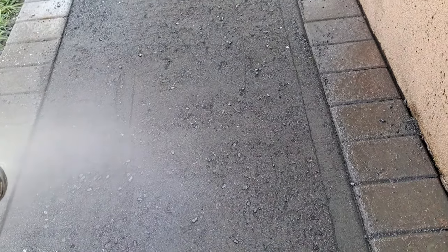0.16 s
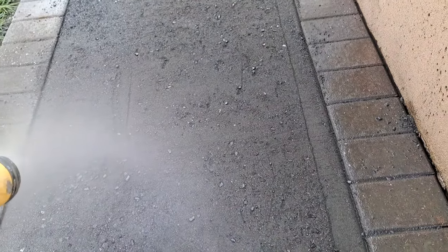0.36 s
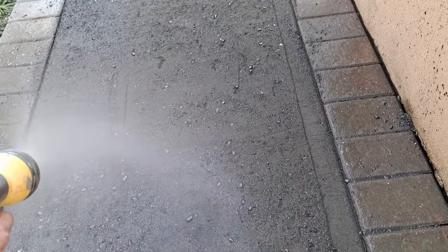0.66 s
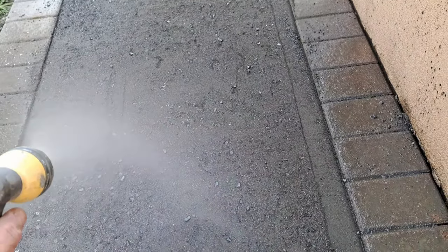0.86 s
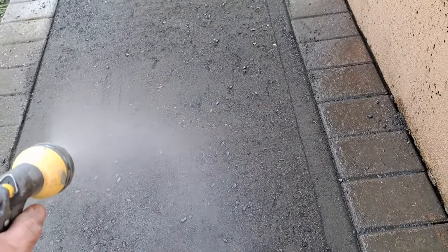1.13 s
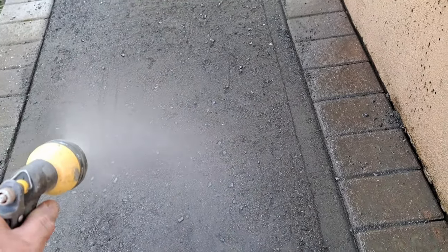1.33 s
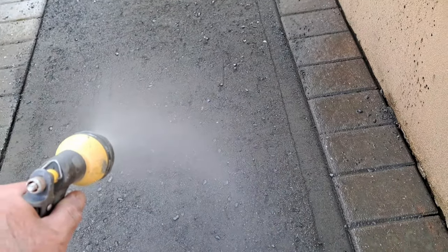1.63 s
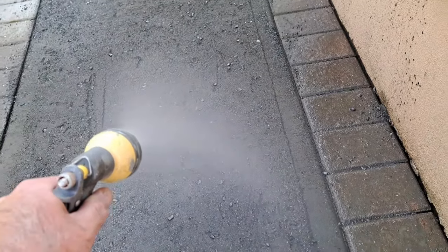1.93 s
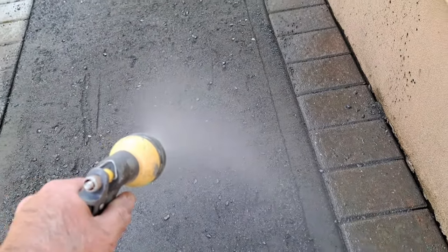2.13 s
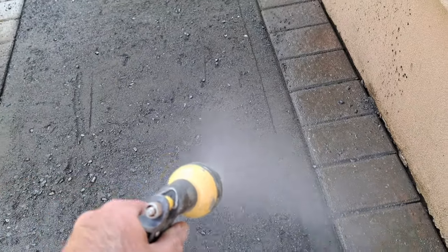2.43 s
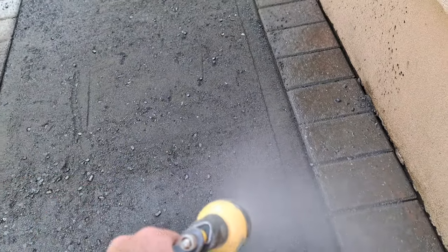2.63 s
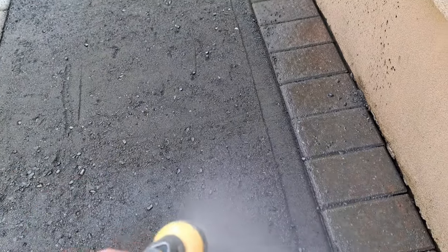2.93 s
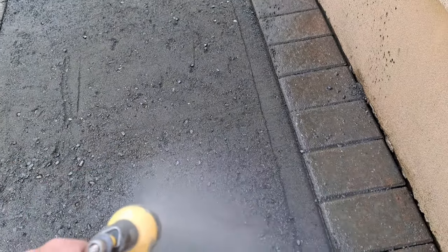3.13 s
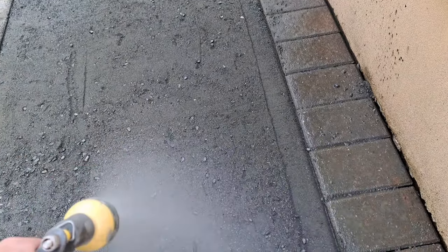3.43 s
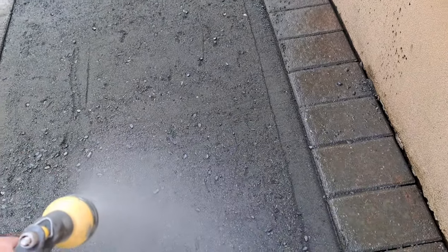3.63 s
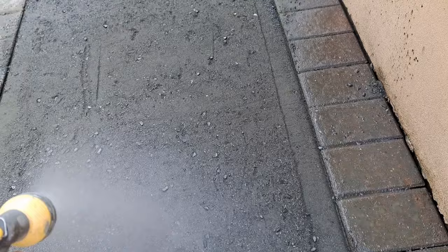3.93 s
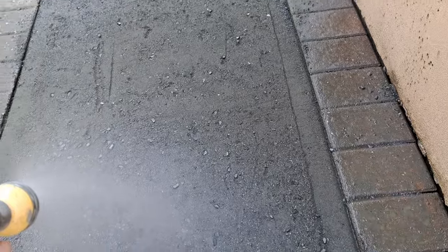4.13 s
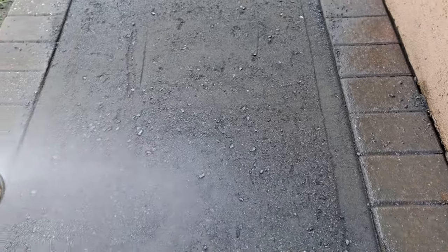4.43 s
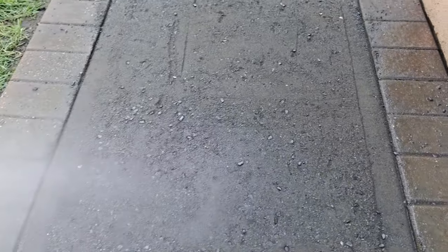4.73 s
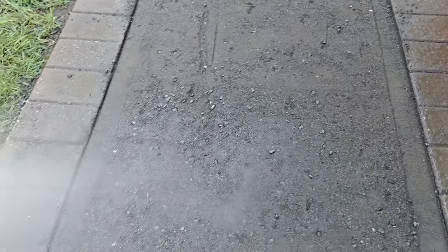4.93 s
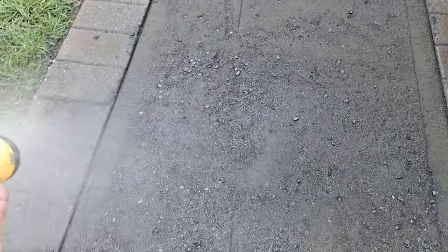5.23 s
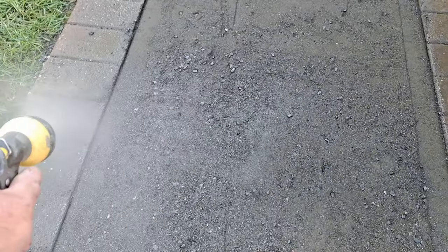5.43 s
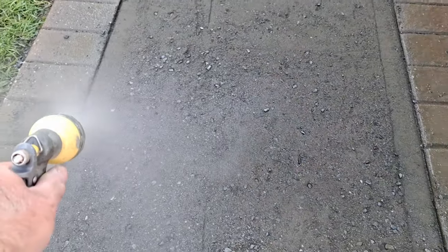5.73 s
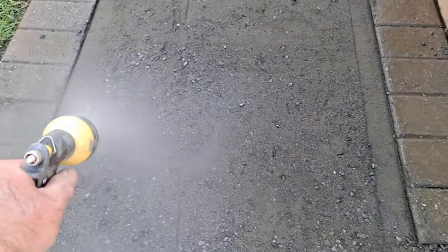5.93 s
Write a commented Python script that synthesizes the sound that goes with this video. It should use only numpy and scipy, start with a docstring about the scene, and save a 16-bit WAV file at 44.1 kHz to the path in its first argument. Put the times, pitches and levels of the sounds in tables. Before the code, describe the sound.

Fine water spray hisses continuously nearby, its tone sliding as the hand swings; a low idling engine cuts out early and grit crunches underfoot midway.

```python
"""Fine spray hisses close by from a hand-held hose nozzle that swings across and back over a concrete path.
The hiss is filtered noise with ticking droplets; the hollow head sings near 1.6 kHz as noise through resonances.
A near echo colours both, and its colour slides as the hand moves. Grit crunches twice underfoot, as short bursts.
An idling engine, tones and rumble in step, throbs until just before two seconds.
The faint murmur of distant traffic is low noise, joined late by a few far engine tones."""
import sys
import numpy as np
from scipy import signal
from scipy.fft import rfft, irfft, next_fast_len
from scipy.io import wavfile
from scipy.ndimage import uniform_filter1d, map_coordinates

SR = 44100
rng = np.random.default_rng(int(sys.argv[2]) if len(sys.argv) > 2 else 0)


def dump_mix(stems):
    """Bounce the given channels to the path in sys.argv[1] as a 16-bit WAV at rate SR."""
    frames = np.atleast_2d(stems).T  # one column per channel
    limited = np.clip(frames, -1, 1)  # hard clip at full scale
    pcm = np.round(limited * 32767).astype(np.int16)
    wavfile.write(sys.argv[1], SR, pcm)


N = 267687
TIME = np.arange(N) / SR  # [s]


def amp(db):
    """Turn decibels into a gain."""
    return 10 ** (np.asarray(db) / 20)


def unit(x):
    """Scale a sound to an rms level of 1."""
    return x / np.sqrt(np.mean(x ** 2) + 1e-20)


def along(points, hz):
    """Read a curve of (frequency, value) points, joined by straight lines on a log frequency axis."""
    f, v = np.transpose(points)
    return np.interp(np.log(hz + 1), np.log(f + 1), v)


def curves(rows):
    """Give one value per sample for each column after the time."""
    s, *cols = np.transpose(rows)
    return [np.interp(TIME, s, c) for c in cols]


def swells(rows):
    """Add up bell-shaped lifts in dB from (time, lift, half length) rows."""
    return sum(db * np.exp(-((TIME - s) / half) ** 2) for s, db, half in rows)


def wobble(rate):
    """Draw a smooth random curve through `rate` random points a second."""
    knots = rng.standard_normal(int(N * rate / SR) + 4)
    return map_coordinates(knots, [TIME * rate])


def filtered(x, response):
    """Multiply the spectrum of x by a response of frequency."""
    m = next_fast_len(x.shape[-1] + 8192)
    hz = np.fft.rfftfreq(m, 1 / SR)
    return irfft(rfft(x, m) * response(hz), m)[..., :x.shape[-1]]


def delayed(x, ms):
    """Play x late by a delay that may change over time."""
    return map_coordinates(x, [(TIME - ms / 1000) * SR], order=5, mode="mirror")


def panned(pan_db):
    """Left and right gains of constant power; a positive balance favours the left."""
    g = amp(np.array([pan_db, -pan_db]) / 2)
    return g / np.sqrt(np.mean(g ** 2, axis=0))


def low_noise(spectrum):
    """Stereo noise of rms 1: sound shared by both sides, plus a part with opposite sign at each side."""
    # left-right likeness of the low sounds: (frequency [Hz], correlation [-1 to 1])
    likeness = [(30, 0.54), (140, 0.92), (300, 0.69), (700, 0.38)]

    def response(hz):
        turn = np.arccos(np.clip(along(likeness, hz), -1, 1)) / 2
        return amp(along(spectrum, hz)) * [np.cos(turn), np.sin(turn)]

    mid, side = filtered(rng.standard_normal((2, N)), response)
    return unit(np.array([mid + side, mid - side]))


def causal(x, gain, size=4096):
    """Pass x through a body with this gain of frequency, which rings only after it is struck."""
    # folding the cepstrum forward in time gives the minimum-phase response
    cepstrum = irfft(np.log(gain(np.fft.rfftfreq(size, 1 / SR)) + 1e-6))
    cepstrum[1:size // 2] *= 2
    cepstrum[size // 2 + 1:] = 0
    return irfft(rfft(x, size) * np.exp(rfft(cepstrum)))


def at_ports(x, place, lead=1):
    """Nozzle sound reaches the right side a little after the left, more so as the hand swings left."""
    lead_ms, lead_ms_per_m = 0.17, 0.18
    return np.array([x, delayed(x, lead * (lead_ms + lead_ms_per_m * place))])


def echoed(pair, place, left, right):
    """A near echo strengthens some pitches and weakens others; these slide as the hand swings."""
    # echo at the left, then the right side: (lag at the turning point [ms], growth of the lag [ms per m])
    echo_lags = [(1.25, 1.95), (1.184, 1.403)]
    sides = []
    for side, share, (ms, ms_per_m) in zip(pair, (left, right), echo_lags):
        sides.append(side + share * delayed(side, ms + ms_per_m * place))
    return unit(np.array(sides))


def traffic():
    """Distant roads murmur as low noise; far engines join late as slightly unsteady tones."""
    # colour of the road murmur: (frequency [Hz], relative level [dB])
    road_colour = [(20, -30), (42, -2.5), (62, 1), (88, -7), (120, -3.5), (155, -13), (250, -15),
                   (330, -20), (430, -18.5), (600, -30), (900, -24), (2000, -70)]
    # far engines: (frequency [Hz], middle peak level [dB], start [s], end [s])
    far_engines = [(167.1, -62, 4.2, 6.1), (231.7, -63.5, 4.3, 6.1), (322, -64, 4.5, 5.05)]
    engines = 0
    for hz, db, start, end in far_engines:
        level = amp(db + 1.15 * wobble(2.28))
        tone = np.sin(2 * np.pi * hz * TIME + 0.5 * wobble(5))
        fade = np.clip(np.minimum(TIME - start, end - TIME) / 0.18, 0, 1)
        engines = engines + level * tone * fade
    murmur = low_noise(road_colour) * amp(-53 + 0.061 * wobble(1.9))
    return murmur + engines


def idling(stop=1.884, fade=0.004):
    """Three cylinders fire in turn, each with a puff of rumble; the throb ends abruptly (times in s)."""
    # engine tones: (multiple of the cycle rate, middle rms level [dB])
    orders = [(4, -50), (6, -51.5), (7, -58), (9, -55), (12, -57), (18, -50.5), (21, -59), (22, -54),
              (24, -57.5)]
    # colour of the rumble: (frequency [Hz], relative level [dB])
    rumble_colour = [(18, -35), (36, 2), (55, 3), (80, -8.5), (105, -2.5), (135, 0), (170, -8),
                     (260, -16.5), (330, -14), (420, -19), (520, -23.5), (700, -31), (1500, -100)]
    # the deep rumble swells before it stops: (time [s], lift [dB], half length [s])
    labour = [(1.7, 3, .3)]
    cycle_hz, deep_hz, lump_db = 5.65, 70, 3
    turns = cycle_hz * TIME + 0.0014 * wobble(4.06)
    tones = 0
    for k, db in orders:
        level = amp(db + 0.87 * wobble(6.5))
        tones = tones + level * np.sin(2 * np.pi * (round(k) * turns + rng.random()))
    puffs = 1 + 0.09 * np.cos(2 * np.pi * 3 * turns)
    noise = low_noise(rumble_colour)
    deep = filtered(noise, lambda hz: 1 / (1 + (hz / deep_hz) ** 4))
    # only the deep part surges
    surging = deep * amp(lump_db * wobble(13.7) + swells(labour))
    rumble = unit(noise - deep + surging) * puffs * amp(-45 + wobble(9.24))
    running = np.clip((stop - TIME) / fade + .5, 0, 1)
    return (np.sqrt(2) * tones + rumble) * running


def grit():
    """Small stones crack under a grinding shoe: each a sharp snap, then a few milliseconds of crumbling."""
    # cracks: (time [s], peak before panning [dB], brightness [dB], knock [dB], snap [times the crumbling])
    cracks = [(4.0125, -35, -2, -12, 2), (4.0202, -28, -8, -3, 3), (4.0285, -33, -3, -4, 1),
              (4.0635, -30, 7, -8, 2), (4.3555, -31, -14, -30, 1), (4.3605, -17.3, -26, -40, 22),
              (4.3621, -27.5, -8, -30, 5), (4.3775, -32, -16, -30, 3), (4.3807, -27, -18, -30, 2),
              (4.3942, -28, -14, -30, 7), (4.4004, -27.5, -20, -26, 7), (4.410, -33, -16, -30, 4)]
    # colours of crushing, splintering and the paving under the stones: (frequency [Hz], relative level [dB])
    crunch = [(200, -3), (1000, -19), (1450, 1), (2300, 8), (3200, 2.5), (3800, 10), (5400, 3), (6500, -16),
              (15000, -47)]
    splinter = [(2000, 0), (5000, 7), (7500, 17.5), (9000, -3), (12000, 18.5), (15500, -46)]
    paving = [(200, -15), (500, -2), (720, 22), (800, 7), (900, 25), (1030, 6), (1200, 18), (1600, -15),
              (2400, 27), (2900, 13), (3600, 2), (5000, -18)]
    crack_s = 0.016  # the crumbling falls by 60 dB in this time
    scuff_s, scuff_half_s, scuff_db = 4.387, 0.03, -48.5  # level is before the swell and panning
    # the sole grinds among the louder cracks: a brief swell of tiny grains, at about 4000 a second
    grains = rng.standard_normal((2, N)) * (rng.random((2, N)) < 4000 / SR)
    scuff = unit(filtered(grains, lambda hz: amp(along(crunch, hz)))) * amp(scuff_db)
    out = scuff * np.exp(-((TIME - scuff_s) / scuff_half_s) ** 2)
    t = np.arange(SR // 10) / SR
    for s, db, bright_db, knock_db, snap in cracks:
        burst = rng.standard_normal((2, len(t))) * amp(-60 * t / crack_s)
        burst[:, 0] = snap

        def colour(hz):
            bright = amp(bright_db + along(splinter, hz))
            knock = amp(knock_db + along(paving, hz))
            return amp(along(crunch, hz)) + bright + knock

        crack = causal(burst, colour)
        start = round(s * SR)
        out[:, start:start + crack.shape[1]] += amp(db) * crack / np.abs(crack).max(axis=1, keepdims=True)
    return panned(-6)[:, None] * out  # mostly at the right


def nozzle_head(place):
    """Turbulent water makes the hollow head ring; its tone leans lower as it swells."""
    # resonances: (frequency [Hz], width of one of three passes [Hz], gain [dB], share of the swells)
    cavity = [(990, 280, -17, .5), (1518, 136, -5.5, 2.5), (1646, 170, 1, 0.59)]
    # louder or softer singing as the nozzle turns: (time [s], lift [dB], half length [s])
    ring_swells = [(0.8, -0.5, 0.24), (2.6, 3, 0.055), (2.95, 2.5, 0.23), (4.18, 1.2, 0.16)]
    ring_db, pan_db, pan_per_db = -54, 1.5, -3.5  # each dB of swell shifts the balance to the right
    pair = at_ports(rng.standard_normal(N), place, lead=0.73)
    pair = pair + .35 * rng.standard_normal((2, N))
    lift_db = swells(ring_swells)

    def mode(centre, width):
        def resonance(hz):
            one_pass = hz * width / (centre * centre - hz * hz + 1j * hz * width)
            return np.abs(one_pass) ** 3
        return filtered(pair, resonance)

    ring = sum(mode(hz, width) * amp(db + share * lift_db) for hz, width, db, share in cavity)
    ring = echoed(ring, place, left=0.1, right=0.28)
    return ring * panned(pan_db + pan_per_db * lift_db) * amp(ring_db)


def jets(place, direct, drops):
    """White rush of the jets at both sides, with the ticking of droplets in it and a near echo."""
    droplets = unit(rng.standard_normal((2, N)) * (rng.random((2, N)) < 900 / SR))  # about 900 a second
    shared = direct * at_ports(rng.standard_normal(N), place)
    pair = shared + rng.standard_normal((2, N)) + drops * droplets
    return echoed(pair, place, left=.24, right=.13)


def patchy(x, depth_db, size):
    """Random gain patches, some hundred Hz wide and size frames long, under the colours of the turning nozzle."""
    # dip at the left throughout, drifting slightly upward and changing in depth after 4.3 s:
    # (time [s], frequency [Hz], depth [dB])
    hollow = [(4.3, 5900, -6.5), (4.65, 6200, -8), (5.5, 6240, -6), (6.07, 6300, -8)]
    # ridges (+) and notches (-) that slide through the hiss at the right as the nozzle turns:
    # (start [s], end [s], start frequency [Hz], end frequency [Hz], lift [dB], half width [Hz])
    glides = [(-.3, 1.05, 5920, 6020, -10, 170), (-.3, .9, 6920, 6800, -10, 150),
              (-.3, 1.3, 4000, 3800, -2.5, 400), (0, 1.35, 2680, 2850, 3, 190),
              (.8, 2.25, 2220, 2560, 6, 160), (1.1, 2.3, 3170, 3620, -6, 140),
              (1.8, 2.6, 3150, 3500, 3.5, 130), (2.75, 4, 3560, 3880, -9, 210),
              (2.8, 4.3, 2950, 1800, 4, 190), (2.35, 3.3, 4550, 4850, -6, 170),
              (3.3, 4.4, 6400, 6200, -5, 200), (4.6, 5.5, 4050, 3900, -3.5, 250),
              (5.05, 6.3, 3170, 3000, 5, 200)]
    # passing colours at the right: (time [s], frequency [Hz], lift [dB], half length [s], half width [Hz])
    tints = [(0.332, 7940, 6.5, 0.38, 220), (1.744, 7550, -4, 0.88, 380), (2.31, 6150, 1.5, 0.69, 220),
             (2.402, 5000, 5.5, 0.14, 300), (2.453, 3900, 5, 0.63, 281), (3.2, 15300, 6, 0.49, 450),
             (4.947, 7300, 5.5, 0.3, 260)]
    hollow_width_hz, glide_fade_s = 480, 0.41
    hz, t, z = signal.stft(x, SR, nperseg=1024)
    field = rng.standard_normal(z.shape)
    for _ in range(2):  # smooth over frequency, then time
        field = uniform_filter1d(field, size=4, axis=1)
        field = uniform_filter1d(field, size=size, axis=2)

    def band(centre, width):
        return np.exp(-((hz[:, None] - centre) / width) ** 2)

    times, dip_hz, dip_db = np.transpose(hollow)
    left_db = np.interp(t, times, dip_db) * band(np.interp(t, times, dip_hz), hollow_width_hz)
    right_db = 0
    for start, end, f0, f1, db, width in glides:
        gate = np.clip(np.minimum(t - start, end - t) / glide_fade_s + .5, 0, 1)
        right_db = right_db + db * gate * band(np.interp(t, [start, end], [f0, f1]), width)
    for s, f, db, half, width in tints:
        right_db = right_db + db * band(f, width) * np.exp(-((t - s) / half) ** 2)
    gain = amp(depth_db * unit(field) + np.array([left_db, right_db]))
    return signal.istft(z * gain, nperseg=1024)[1][:, :N]


def mist(place):
    """The spray: jets make a broad hiss and, above it, the sizzle of the finest drops."""
    # colour of the hiss at each side: (frequency [Hz], relative level [dB])
    left_colour = [(200, -17), (700, -16), (1000, -13.5), (1300, -8), (2000, -1.5), (2500, -11.5),
                   (3000, -6), (4400, -8.5), (4800, -11), (5400, -4), (5900, -0.5), (7300, -5.5),
                   (8800, -11), (9600, -3), (10900, -1), (11600, -0.5), (12900, 20), (14300, -3),
                   (15600, 0.5)]
    right_colour = [(200, -40), (750, -13), (1000, -5), (1350, -9), (1950, 2.3), (2300, 1), (3000, 2.5),
                    (3500, 0), (5000, -0.16), (7500, 2.5), (8200, -2), (8850, -7.5), (9900, -21),
                    (10900, -4), (11700, 9), (12500, 9), (13200, 1), (14700, 10.5), (15700, -2)]
    # brief surges of the spray: (time [s], lift [dB], half length [s])
    surges = [(1.1, 2.5, 0.061), (2.36, 1.2, 0.15), (5.63, 1.1, 0.087)]
    # course of the top treble, before the settings of each side: (time [s], level [dB])
    treble = [(0.0, -53), (0.64, -52), (2.6, -51), (3.31, -52), (3.72, -56), (4.06, -51.5), (4.38, -53.5),
              (5.02, -55.5), (5.43, -51.5), (5.6, -54.5), (6.07, -52)]
    hiss_db, hiss_db_per_m = -46, -3  # at the turning point, and the change for each metre to the left
    right_lift_db, left_db, left_follows = 7.5, -52.5, 0.19  # the left takes only a share of the course
    rush = jets(place, direct=1.25, drops=.3)
    rush = patchy(rush, depth_db=1.7, size=60)
    rush = filtered(rush, lambda hz: amp([along(left_colour, hz), along(right_colour, hz)]))
    # the sizzle takes over from the hiss between 10 and 11.5 kHz
    high = filtered(rush, lambda hz: np.clip((hz - 10000) / 1500, 0, 1))
    surge_db = swells(surges)
    hiss = unit(rush - high) * amp(hiss_db + hiss_db_per_m * place + surge_db + 0.61 * wobble(14))
    top_db, = curves(treble)
    side_db = np.array([left_db + left_follows * (top_db - top_db.mean()), right_lift_db + top_db])
    sizzle = np.array([unit(side) for side in high])
    sizzle = sizzle * amp(side_db + 0.87 * surge_db + 0.65 * wobble(21.1))
    return hiss + sizzle


def scene():
    """Far traffic and an engine lie behind the grit and the close spray, which follows the hand."""
    # swing of the hand: (time [s], distance of the nozzle left of its turning point [m])
    swing = [(0, 0.57), (1, 0.48), (2, 0.28), (2.65, 0.015), (3.05, 0.073), (3.5, 0.26), (4.2, 0.38),
             (4.8, 0.6), (5.1, 0.67), (5.55, 0.44), (6.07, 0.38)]
    place, = curves(swing)
    return traffic() + idling() + grit() + nozzle_head(place) + mist(place)


def record(dry):
    """Keep only what lies below a sharp upper band limit."""
    top_hz = 15830
    return filtered(dry, lambda hz: hz < top_hz)


dry = scene()
out = record(dry)
dump_mix(out)
```